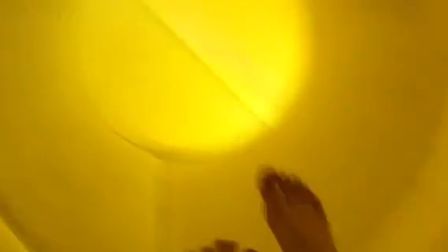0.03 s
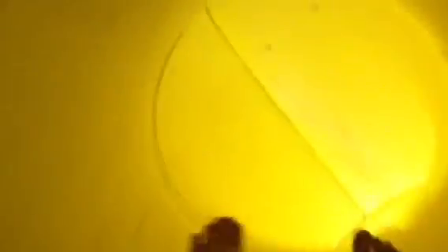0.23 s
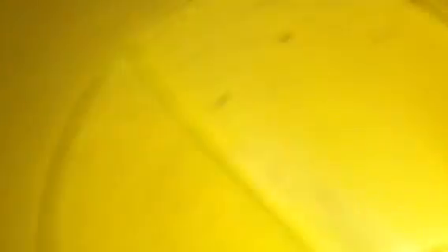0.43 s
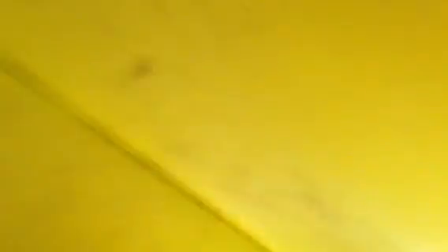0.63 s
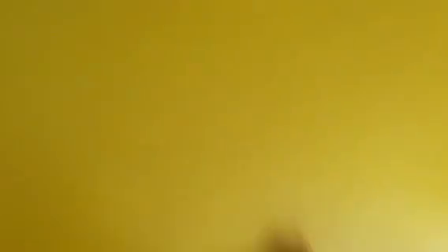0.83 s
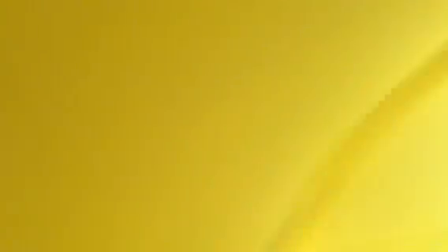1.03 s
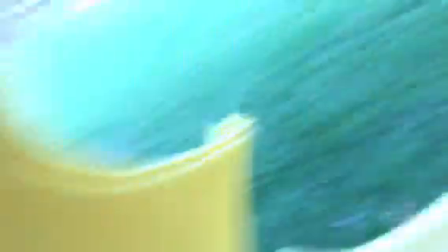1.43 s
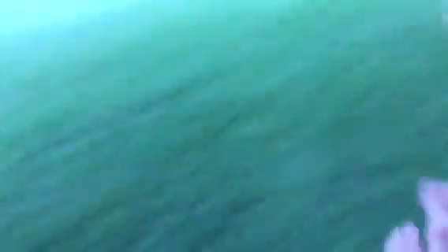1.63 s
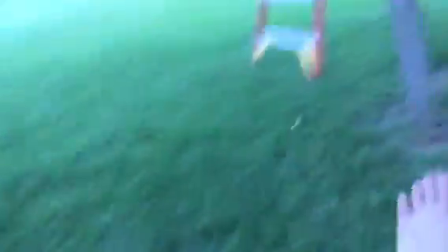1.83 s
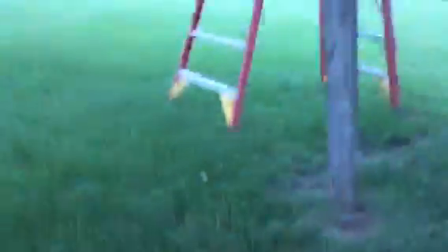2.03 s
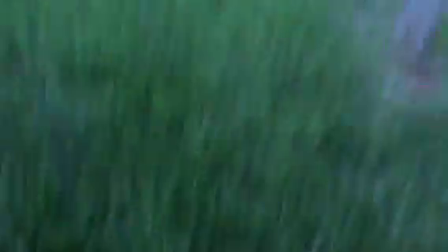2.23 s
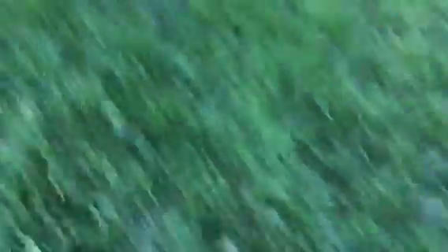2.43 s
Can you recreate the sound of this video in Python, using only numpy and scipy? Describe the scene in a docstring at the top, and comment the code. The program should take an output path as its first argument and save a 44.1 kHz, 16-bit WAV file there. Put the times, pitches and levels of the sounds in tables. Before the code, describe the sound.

A person slides down a plastic tube slide, body and clothes rubbing, with hollow knocks against the wall. Out in the yard it gives way to duller rubbing on the handheld microphone, with a deep buffeting rumble throughout.

```python
"""Down a plastic tube slide

A person slides down holding a phone, then moves off over the lawn. Body and clothes stick and slip on
the hollow shell, limbs knock on its wall and seams, and the tube rings briefly. Outside, a duller
rubbing on the phone goes on; jolts and moving air make a deep boom at the microphone throughout."""
import sys
import numpy as np
from scipy import signal
from scipy.fft import rfft, irfft
from scipy.io import wavfile
from scipy.ndimage import uniform_filter1d

SR = 44100
rng = np.random.default_rng(int(sys.argv[2]) if len(sys.argv) > 2 else 0)


def log_audio(samples):
    """Write samples as a 16-bit WAV file to the path given in sys.argv[1]."""
    # one column per channel
    frames = np.atleast_2d(samples).T
    # limit to full scale, then quantise
    limited = np.clip(frames, -1, 1)
    pcm = np.round(limited * 32767).astype(np.int16)
    wavfile.write(sys.argv[1], SR, pcm)


N = 114660


def undb(db):
    return 10 ** (np.asarray(db) / 20)


def unit(x):
    return x / np.sqrt(np.mean(x ** 2))


def times():
    return np.arange(N) / SR


def pan(left_db):
    return undb(np.array([[left_db], [-left_db]]) / 2)


def fader(curve, fade_in_s, fade_out_s):
    """Gain riding a level curve, fading in and out beyond its ends."""
    s, db = np.array(curve).T
    t = times()
    fade_in = np.clip(1 + (t - s[0]) / fade_in_s, 0, 1)
    fade_out = np.clip(1 - (t - s[-1]) / fade_out_s, 0, 1)
    return undb(np.interp(t, s, db)) * fade_in * fade_out


def over_hz(points):
    """Spread (frequency, value) points over the frequency axis."""
    hz, value = np.array(points, float).T
    return np.interp(np.log(np.arange(N // 2 + 1) * SR / N + 1), np.log(hz), value)


def convolve(x, response):
    return signal.fftconvolve(np.atleast_2d(x), np.atleast_2d(response), axes=1)[:, :N]


def equalise(x, eq):
    """Minimum-phase EQ with unit power gain: the curve sets only the tone."""
    gain = unit(undb(over_hz(eq)))
    cepstrum = irfft(np.log(gain), N)
    cepstrum[1:N // 2] *= 2
    cepstrum[N // 2:] = 0
    response = irfft(np.exp(rfft(cepstrum)), N)
    return convolve(x, response[:N // 20])


def wander(rate_hz):
    """Smooth random modulation with an RMS of 1."""
    hold = max(int(SR / rate_hz), 2)
    steps = np.repeat(rng.standard_normal(N)[:N // hold + 1], hold)
    return unit(uniform_filter1d(steps, hold)[:N])


def friction(slips_per_s, spread_db, smooth, judder_hz, judder_db):
    """Tiny slips of uneven size over a smooth rub, bunched by the judder of the contact."""
    slips = (rng.random((2, N)) < slips_per_s / SR) * rng.choice([-1, 1], (2, N))
    sizes = undb(spread_db * np.clip(rng.standard_normal((2, N)), -2, 2))
    rub = unit(slips * sizes) + smooth * rng.standard_normal((2, N))
    return unit(rub * undb(judder_db * wander(judder_hz)))


# Stereo image, wide in the tube and narrow outside (frequency [Hz], left-right correlation [-1..1])
IN_TUBE = [(60, 0.85), (130, 0.76), (300, 0.62), (650, 0.39), (1100, 0.0028), (1600, 0.23), (2800, -0.14),
           (5000, 0.056)]
IN_OPEN = [(60, .98), (300, 0.92), (700, 0.9), (1600, 0.68), (2600, 0.51), (4500, 0.043)]

def stereo(pair, image):
    """Mix two unrelated signals as mid and side, with a width for each frequency."""
    correlation = np.clip(over_hz(image), -.99, .99)
    mid = rfft(pair[0]) * np.sqrt((1 + correlation) / 2)
    side = rfft(pair[1]) * np.sqrt((1 - correlation) / 2)
    return irfft(np.array([mid + side, mid - side]), N)


def towards_mouth(pair, deep_s=0.38, mouth_s=1.36):
    """Sound comes from all round inside the tube and narrows towards its mouth."""
    openness = np.interp(times(), [deep_s, mouth_s], [0, 1])
    return (1 - openness) * stereo(pair, IN_TUBE) + openness * stereo(pair, IN_OPEN)


# Bass-heavy outdoor air (frequency [Hz], gain [dB])
YARD_EQ = [(20, -3), (50, 3.5), (250, -23.5), (1500, -26), (6000, -37.5), (15000, -49)]

def yard():
    """A faint, steady bed of outdoor ambience."""
    air = stereo(rng.standard_normal((2, N)), IN_OPEN)
    return unit(equalise(air, YARD_EQ)) * undb(-47.5)


# Boxy rustle (frequency [Hz], gain [dB])
SHUFFLE_EQ = [(300, 0.5), (650, 5), (1100, -9), (1700, -21), (3000, -8), (4200, -16), (6000, -42),
              (15000, -55)]

def shuffling(set_off_s=0.15):
    """A light shuffle rubs on the tube before setting off."""
    slips = friction(slips_per_s=630, spread_db=4, smooth=1.0, judder_hz=39, judder_db=3.5)
    rub = unit(equalise(stereo(slips, IN_TUBE), SHUFFLE_EQ))
    gate = np.clip((set_off_s - times()) / 0.015, 0, 1)
    return rub * gate * undb(-45.5) * pan(3.8)


# Fader rides for the boom and the rumble (time [s], relative level [dB])
BOOM_RIDE = [(0.1, -64), (0.22, -21), (0.25, -39), (0.36, -20.5), (0.38, -27.5), (0.45, -10.5), (0.52, -13),
             (0.56, -6.5), (0.62, -21.5), (0.72, -10.5), (0.81, -30.5), (0.92, -15), (1.0, -42),
             (1.09, -23), (1.21, -33), (1.25, -15), (1.46, -37), (1.5, -19.5), (1.58, -49), (1.68, -22),
             (1.71, -39), (1.84, -11), (1.91, -48), (1.94, -22.5), (2.16, -19), (2.2, -44), (2.23, -22.5),
             (2.6, -38)]
RUMBLE_RIDE = [(0.1, -49), (0.13, -38), (0.3, -23.5), (0.33, -37), (0.42, -23), (0.68, -20), (0.92, -26.5),
               (1.32, -24), (1.44, -32.5), (1.71, -34.5), (1.785, -30.5), (1.9, -34.5), (1.98, -27.5),
               (2.3, -30), (2.39, -37.5), (2.6, -34)]
# Low-end weight of the rumble (frequency [Hz], gain [dB])
RUMBLE_EQ = [(15, -22.5), (32, -0.5), (70, -1), (110, -3), (160, -7), (230, -13.5), (400, -42), (1500, -89)]

def buffeting(boom_hz=50.2):
    """A deep, wavering boom and a ragged rumble from jolts and air at the microphone."""
    phase = 2 * np.pi * np.cumsum(boom_hz * (1 + .1 * wander(34.83))) / SR
    side = undb(-22.5) * wander(40) * np.cos(phase) * np.array([[1], [-1]])
    boom = np.sqrt(2) * (np.sin(phase) + side) * fader(BOOM_RIDE, 0.0205, .02) * undb(0.4)
    jolts = friction(slips_per_s=300, spread_db=2.0, smooth=0.94, judder_hz=30, judder_db=1.55)
    rumble = unit(equalise(towards_mouth(jolts), RUMBLE_EQ))
    return (boom + rumble * fader(RUMBLE_RIDE, 0.028, .02) * undb(2.53)) * pan(0.42)


# Resonances of the plastic wall (frequency [Hz], T60 [s], relative level [dB])
SHELL_MODES = [(293.6, .1, 2.5), (390, 0.15, -6), (448, 0.054, -2.5), (580, 0.084, -5), (665, 0.096, -12),
               (1220, 0.069, -14)]

def shell(x, drift=.04, drift_hz=6.75):
    """The wall rings in damped modes that drift as the body's weight moves along it."""
    out = x
    for hz, t60, db in SHELL_MODES:
        carrier = np.exp(2j * np.pi * np.cumsum(hz * (1 + drift * wander(drift_hz))) / SR)
        pole = np.exp(-np.log(1000) / (t60 * SR))
        mode = 2 * np.real(carrier * signal.lfilter([1 - pole], [1, -pole], x / carrier))
        out = out + undb(db - 2) * mode
    return out


def tube(x, t60_s=0.23, predelay_s=.003):
    """Dense, short echoes between the tube's walls."""
    t = times()
    tail = stereo(rng.standard_normal((2, N)), IN_OPEN) * 10 ** (-3 * t / t60_s) * (t > predelay_s)
    wet = undb(-10)
    return (x + wet * convolve(x, unit(tail) / np.sqrt(N))) / np.hypot(1, wet)


# Fader rides for body and cloth on the plastic (time [s], relative level [dB])
BODY_RIDE = [(.108, -44), (.126, -47), (.134, -27.5), (.27, -28), (.33, -25), (.383, -30), (.392, -21),
             (.47, -23), (.58, -24), (.65, -20.5), (.73, -22), (.87, -23), (.94, -27.5), (1.0, -24.5),
             (1.17, -30), (1.21, -25.5), (1.31, -21.5), (1.35, -31), (1.5, -40)]
CLOTH_RIDE = [(.11, -55), (.14, -41), (.21, -42), (.26, -37.5), (.38, -34), (.45, -31.5), (.58, -35.5),
              (.8, -35.5), (1.02, -37.5), (1.14, -40.5), (1.22, -38.5), (1.36, -44), (1.5, -49)]
# Dark body rub, cloth hiss and the fizz on top (frequency [Hz], gain [dB])
BODY_EQ = [(100, -12), (200, 0), (300, -2.5), (460, -3), (700, -4), (1000, -7.5), (1400, -13), (2000, -18),
           (3000, -21.5), (5000, -48), (15000, -56)]
CLOTH_EQ = [(700, -8.5), (1800, 0.5), (2700, -2.5), (4000, -4.5), (5500, -13.5), (7500, -22.5),
            (10000, -31.5), (15000, -44.5)]
FIZZ_EQ = [(2500, -20), (4500, 5), (6000, 3), (8000, -10), (10000, -23), (15000, -48)]

def sliding():
    """The body sticks and slips on the shell; cloth hisses along it, brighter the harder it rubs."""
    slips = friction(slips_per_s=800, spread_db=1.5, smooth=0.87, judder_hz=60, judder_db=2.5)
    rub = equalise(towards_mouth(slips), BODY_EQ)
    fibres = friction(slips_per_s=2900, spread_db=1.5, smooth=0.86, judder_hz=80, judder_db=1.82)
    pressure = fader(CLOTH_RIDE, 0.014, 0.54)
    hiss = unit(equalise(towards_mouth(fibres), CLOTH_EQ)) * pressure * undb(3)
    fizz_gain = (pressure / pressure.max()) ** 1.73 * undb(-40)
    fizz = unit(equalise(rng.standard_normal((2, N)), FIZZ_EQ)) * fizz_gain
    body = unit(tube(shell(rub))) * fader(BODY_RIDE, 0.014, 0.03) * undb(1.5)
    return (body + hiss + fizz) * pan(0.9)


# Scrape cues (start [s], length [s], level [dB], band centre [Hz])
SCRAPE_CUES = [(0.126, 0.04, -33, 770), (0.141, .022, -26, 1200), (0.316, 0.014, -17.5, 1690),
               (0.388, 0.27, -40.5, 6760), (0.435, .08, -38.5, 7500), (0.635, 0.044, -27, 1300),
               (0.648, 0.24, -42, 6150), (0.796, 0.029, -22, 1500), (0.833, 0.063, -40.5, 7550),
               (1.193, 0.029, -25, 2600), (1.555, 0.048, -29, 1300), (1.676, 0.17, -38, 2030),
               (1.964, .03, -31.5, 2380), (2.004, 0.092, -38.5, 2290), (2.206, 0.1, -44.5, 2270)]

def scrapes(attack_s=0.002):
    """Skin or cloth presses harder for a moment: a gritty bite that tapers away."""
    t, out = times(), 0
    slips = friction(slips_per_s=1800, spread_db=0.5, smooth=0.39, judder_hz=110, judder_db=1.0)
    grit = stereo(slips, IN_TUBE)
    for start, length, db, hz in SCRAPE_CUES:
        envelope = np.clip((t - start) / attack_s, 0, 1) * np.clip(1 - (t - start) / length, 0, 1)
        band = signal.butter(2, [hz / 1.5, hz * 1.245], "band", fs=SR, output="sos")
        out = out + undb(db) * envelope * unit(signal.sosfilt(band, grit))
    return out * pan(1.2)


def blows(cues, eq, decay_s, chatter, image):
    """Each blow is a push followed by a quickly dying chatter of the contact."""
    size, out = N // 20, np.zeros((2, N))
    envelope = chatter * np.exp(-times()[:size] / decay_s)
    grain = stereo(rng.standard_normal((2, N)), image)
    for k, (start, db, *_) in enumerate(cues):
        blow = envelope * np.roll(grain, -k * (N // len(cues)), axis=1)[:, :size]
        blow[:, 0] += 1  # the push
        blow /= np.sqrt(np.sum(blow ** 2) / 2)
        i = int(start * SR)
        out[:, i:i + size] += undb(db) * blow[:, :N - i]
    return equalise(out, eq)


def bumps(cues, rise_s, ring_s):
    """The struck spot swings for a few cycles at its own pitch."""
    t, out = times()[:N // 20], np.zeros(N)
    envelope = (1 - np.exp(-t / rise_s)) * np.exp(-t / ring_s)
    for start, db, hz in cues:
        swing = envelope / envelope.max() * np.sin(2 * np.pi * hz * t)
        i = int(start * SR)
        out[i:i + len(t)] += undb(db) * swing[:N - i]
    return out


# Limbs hit the shell, the hand hits the phone (time [s], relative level [dB], pitch [Hz])
KNOCK_CUES = [(.146, -9.5, 378), (.388, -9, 525), (.398, -6, 299), (.462, -7.5, 392), (.633, -6.5, 317),
              (.655, -11, 450), (.793, -12.5, 288), (.806, -9, 371), (.861, -15.5, 303), (1.034, -11, 380),
              (1.068, -11.5, 670), (1.189, -7, 300), (1.203, -10, 403), (1.211, -10, 510),
              (1.219, -10, 384), (1.292, -20, 292), (1.309, -13, 413), (1.42, -13, 560), (2.585, -14, 264)]
# Seams and fingers tick (time [s], relative level [dB])
TICK_CUES = [(.389, -19), (.454, -12), (.656, -20), (1.034, -20), (1.189, -18.5), (2.045, -32)]
# Round knock and crisp tick (frequency [Hz], gain [dB])
KNOCK_EQ = [(40, -30), (150, 6), (300, 5.5), (450, 3), (800, -13.5), (1300, -15), (2200, -16),
            (4000, -36.5), (8000, -66), (15000, -78)]
TICK_EQ = [(300, 2), (2000, 17), (6000, -15), (10000, -14), (15000, -30)]

def knocks_and_ticks():
    """Hollow knocks ring the shell and echo in the tube along with small, sharp ticks."""
    contact = blows(KNOCK_CUES, KNOCK_EQ, decay_s=0.0033, chatter=0.46, image=IN_OPEN)
    tone = bumps(KNOCK_CUES, rise_s=0.0014, ring_s=0.0045)
    hollow = undb(11.5) * shell(contact) + undb(-5) * tone
    ticks = blows(TICK_CUES, TICK_EQ, decay_s=0.0018, chatter=0.3, image=IN_TUBE)
    return tube(hollow + undb(8) * ticks)


# Thud cues (time [s], envelope peak [dB], pitch [Hz])
THUD_CUES = [(.402, -17, 160), (.466, -14, 125), (.662, -14, 140), (.866, -17, 150), (2.073, -15, 125)]

def thuds():
    """The body's weight lands in soft, low thuds, dry and centred."""
    return bumps(THUD_CUES, rise_s=0.0023, ring_s=0.011)


# Fader ride for the rubbing on the phone (time [s], relative level [dB])
HANDLING_RIDE = [(1.44, -31.5), (1.72, -32), (1.966, -28.5), (2.036, -36), (2.076, -30), (2.11, -39.5),
                 (2.14, -34.5), (2.34, -34), (2.56, -37), (2.6, -33.5)]
# Close, muffled rub (frequency [Hz], gain [dB])
HANDLING_EQ = [(80, -19.5), (200, -4), (350, -5.5), (520, -6.5), (750, -8), (1200, -14), (1750, -19),
               (2700, -25.5), (4200, -36.5), (6500, -56.5), (15000, -61.5)]

def handling(settle_s=(2, 2.4), cutoff_hz=3900):
    """Dry rubbing by the microphone takes over at the tube's mouth and dulls as the grip settles."""
    slips = friction(slips_per_s=630, spread_db=-0.5, smooth=1.0, judder_hz=75, judder_db=1.16)
    rub = unit(equalise(stereo(slips, IN_OPEN), HANDLING_EQ))
    dull = signal.sosfiltfilt(signal.butter(2, cutoff_hz, fs=SR, output="sos"), rub)
    settled = np.interp(times(), settle_s, [0, 1])
    grip = (1 - settled) * rub + settled * dull
    return grip * fader(HANDLING_RIDE, 0.15, .02) * undb(3) * pan(1.4)


def scene():
    rubbing = shuffling() + sliding() + handling()
    accents = knocks_and_ticks() + thuds() + scrapes()
    return rubbing + accents + buffeting() + yard()


def record(dry):
    """The phone clips at full scale and cuts the top end."""
    high_cut = signal.ellip(10, .2, 80, 15750, fs=SR, output="sos")
    return signal.sosfilt(high_cut, np.clip(dry, -1, 1))


dry = scene()
out = record(dry)
log_audio(out)
```